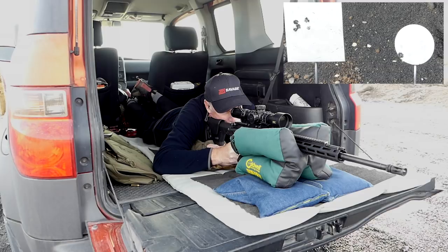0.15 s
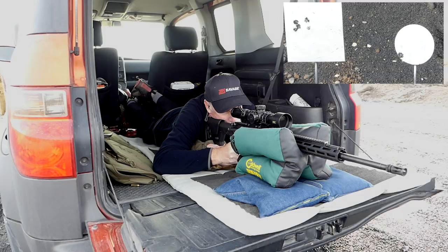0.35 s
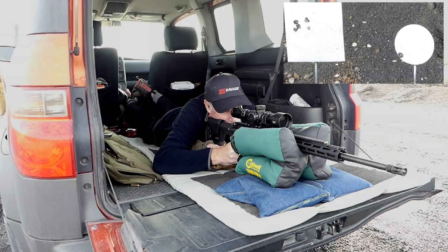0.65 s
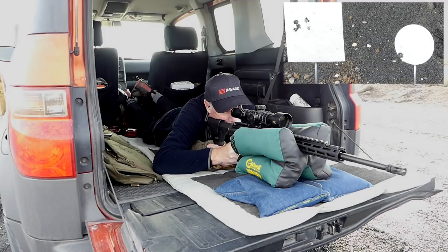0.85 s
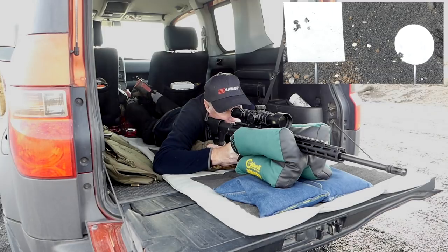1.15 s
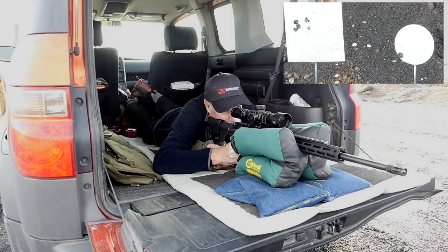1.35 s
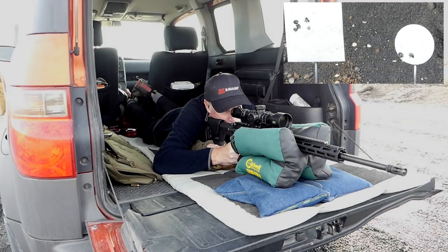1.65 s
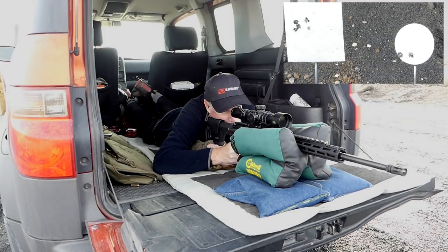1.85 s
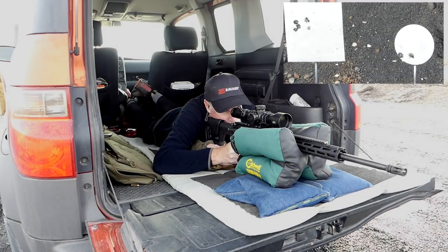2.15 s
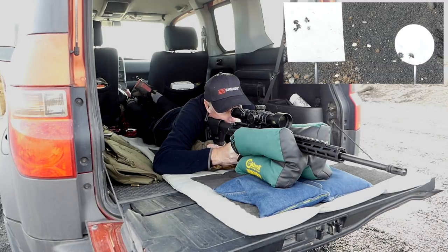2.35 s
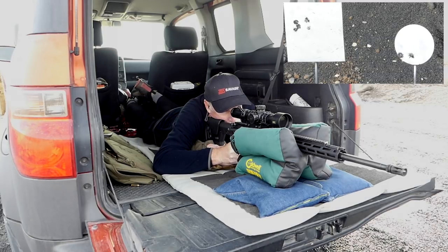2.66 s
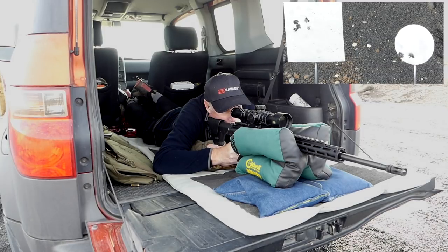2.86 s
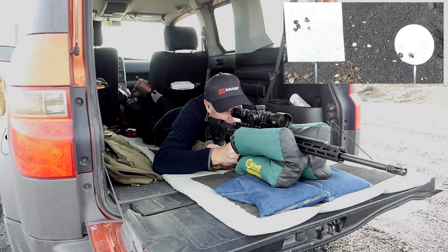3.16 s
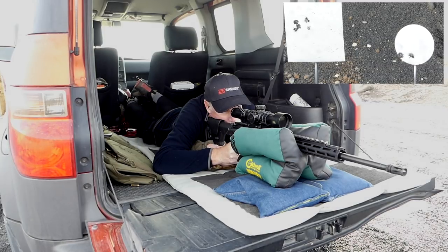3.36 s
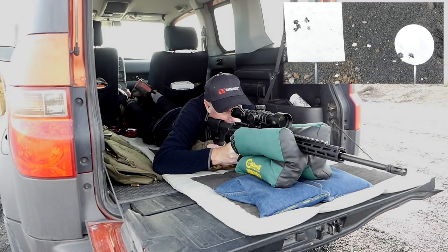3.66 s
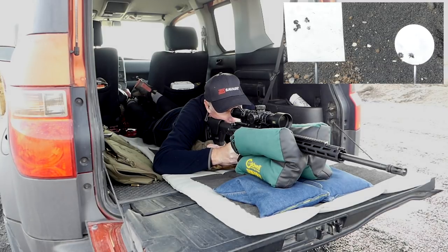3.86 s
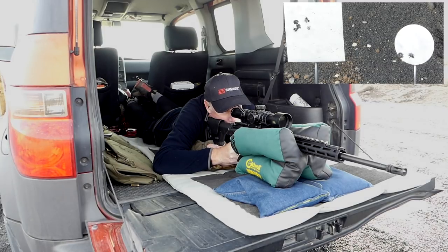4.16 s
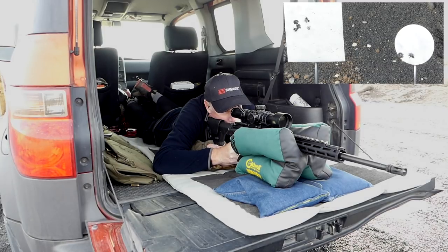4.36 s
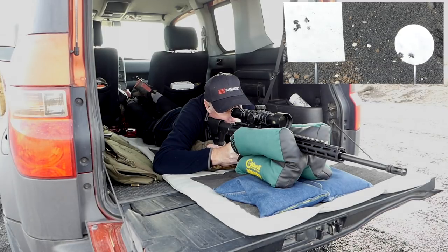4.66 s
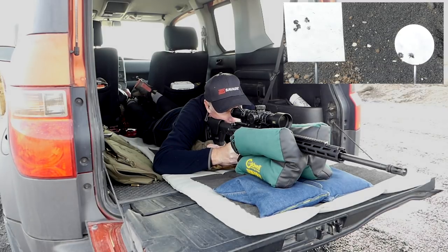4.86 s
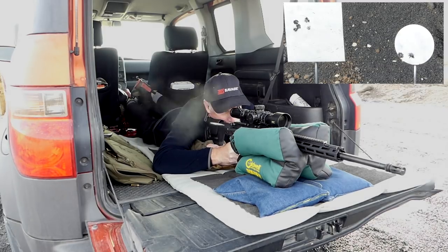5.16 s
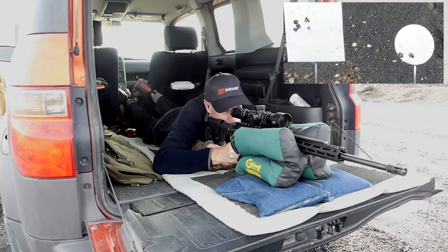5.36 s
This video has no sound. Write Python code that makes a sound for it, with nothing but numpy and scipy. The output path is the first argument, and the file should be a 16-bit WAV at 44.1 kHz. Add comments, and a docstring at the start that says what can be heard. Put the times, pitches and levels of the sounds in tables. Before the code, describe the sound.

Two suppressed rifle shots about four seconds apart, the first followed by a hard metallic plate strike, shimmering ring, pattering grit and rolling echoes.

```python
"""Two suppressed rifle shots and a steel plate

A suppressed rifle fires twice from the back of a car: blast, clattering action, ringing brass, hill echoes.
A far microphone hears the first bullet strike a plate, which rings as grit patters and the blast comes late.
Blows are shaped noise, brass and plate are decaying sines, echoes and air are filtered noise. Each
microphone has its own gain control: the near one turns down bass, the far one everything.
"""
import sys
import numpy as np
from scipy import signal
from scipy.fft import rfft, irfft
from scipy.io import wavfile
from scipy.ndimage import uniform_filter1d

SR = 44100
rng = np.random.default_rng(int(sys.argv[2]) if len(sys.argv) > 2 else 0)


def persist_wave(psi):
    """Save psi, clipped to +-1, as 16-bit WAV."""
    counts = np.round(np.clip(psi, -1, 1) * 32767).astype(np.int16)
    wavfile.write(sys.argv[1], SR, np.atleast_2d(counts).T)


N = 242550  # samples


def amp(db):
    """Turn decibels into a linear gain."""
    return 10 ** (np.asarray(db) / 20)


def evened(x):
    """Scale a sound to an RMS of one."""
    return x / np.sqrt(np.mean(x ** 2) + 1e-20)


def read(points, hz):
    """Read a colour curve at any frequency, along a log-frequency axis."""
    f, value = np.transpose(points)
    return np.interp(np.log(hz + 1), np.log(f + 1), value)


def add(mix, s, sound):
    """Lay a sound into the mix at a time in seconds, cut off at the end."""
    part = mix[:, round(s * SR):][:, :sound.shape[-1]]
    part += sound[..., :part.shape[1]]


def panned(db):
    """Split a left-right level difference into one dB offset for each side."""
    return np.array([[db / 2], [-db / 2]])


def smooth_random(size, width):
    """A slow random curve with an RMS of one."""
    return evened(uniform_filter1d(rng.standard_normal(size), width))


def thinned(x, cut_hz):
    """Take the low end out of a sound."""
    return signal.sosfilt(signal.butter(2, cut_hz, "high", fs=SR, output="sos"), x)


def noise(size, colour, same):
    """Two channels of noise of a given colour (dB as a function of Hz) and left-right likeness."""
    a, b = rng.standard_normal((2, size))
    same = np.clip(same, -1, 1)
    pair = np.array([a, same * a + np.sqrt(1 - same ** 2) * b])
    gain = amp(colour(np.fft.rfftfreq(size, 1 / SR)))
    return evened(irfft(rfft(pair) * gain, size))


def bursts(rows, tail_db, tail_t60, tail_hz):
    """Each blow is a puff of noise with a quick rise and a decay; a weaker, duller tail follows."""
    out, t = np.zeros((2, N)), np.arange(12000) / SR
    for s, db, hz, pan, below, above, rise, t60, same in rows:
        def colour(f):
            low_side = below * np.minimum(np.log2(f / hz + 0.0062), 0)
            high_side = above * np.maximum(np.log2(f / hz + 0.012), 0)
            return low_side - high_side

        puff = noise(len(t), colour, same)
        dull = signal.lfilter(*signal.butter(1, tail_hz, fs=SR), puff)
        sound = amp(-60 * t / t60) * puff + amp(tail_db - 60 * t / tail_t60) * dull
        attack = np.minimum(t / max(rise, 1e-4), 1) ** 2
        # the noise body sits 7 dB under the level in the table, as room for its peaks
        add(out, s, amp(db - 7.0 + panned(pan)) * attack * sound)
    return out


# the two shots: t/s, level/dB
SHOTS = [(0.9449, -1), (5.1809, -0.5)]
# what every shot sets off: hammer, blast, bolt flying back, rattle, thud and clack of the bolt going home
# t/s after the shot, level/dB re the shot, centre f/Hz, left-right/dB, fall below/(dB/octave),
# fall above/(dB/octave), rise/s, t60/s, left-right likeness
RIFLE = [(-.0066, -21.5, 3000, -6, 4.5, 3.5, 0.00031, 0.098, 0.65),
         (0, 5.5, 8000, -1.5, 0.4, -2, 0.00125, 0.025, 0.57),
         (0.0173, 1.5, 1520, 0, 3.5, 4, 0.01, 0.055, 0.79),
         (.03, -12.5, 800, 0.5, -4, -0.5, 0.011, 0.152, 0.55), (.067, -22.5, 478, 3, 12, 25, .005, .09, 1),
         (.077, -18, 4200, -0.5, 11, 5, 0.0022, 0.088, 0.91)]
THUMP_DB, THUMP_AFTER_S, THUMP_S = -9.5, 0.0042, 0.0017  # low push: re the shot, delay, time scale


def rifle():
    """Every shot plays the same chain of blows; the blast's pressure step and undershoot shake the car."""
    rows = [(s + after, db + part_db, *rest) for s, db in SHOTS for after, part_db, *rest in RIFLE]
    out = bursts(rows, tail_db=-13, tail_t60=0.21, tail_hz=2560)
    u = np.arange(4000) / SR / THUMP_S
    push = u * (2 - u) * np.exp(-u)  # swings up, then below zero
    for s, db in SHOTS:
        add(out, s + THUMP_AFTER_S, amp(db + THUMP_DB) * push)
    return out


# at the plate: strike, splinters, plate slamming its hook, rebound, late blast and its echo
# t/s, level/dB, centre f/Hz, left-right/dB, fall below/(dB/octave), fall above/(dB/octave), rise/s, t60/s,
# left-right likeness
STRIKES = [(1.7028, 4, 6640, 6.5, 3.7, 28, 0.00034, 0.027, 0.36),
           (1.708, -14.5, 5200, 3, 17, 8, 0.0027, 0.24, 0.53),
           (1.7155, -10, 2494, 1.5, 2, 4, 0.0024, 0.024, 0.55),
           (1.7275, -5.5, 4860, 3, 8, 15, 0.00085, 0.04, 0.69),
           (1.7497, -2, 6300, 0.5, 3.5, 8, 0.00011, 0.11, 0.68),
           (1.853, -19.5, 3840, -26.5, 2.5, 9.3, 0.0045, 0.057, 0.2),
           (2.01, -33, 8000, -1, 1.5, 15, 0.0065, 0.16, 1),
           (2.5115, -13.5, 1010, 3, 1, 14.5, 0.0011, 0.095, 0.95),
           (2.513, -24, 2600, -2, 1, 20, 0.0017, 0.03, 0.65),
           (2.654, -35, 690, -16, 7, 12, 0.0013, 0.053, 0.53)]


def strikes():
    """The bullet's strike, the plate's blows and the late blast are bursts of noise."""
    return bursts(STRIKES, tail_db=-17, tail_t60=0.49, tail_hz=6030)


# pressure swings at the far microphone; opposite shares = the capsule pair rocks
# t/s, level/dB, starting f/Hz, t60/s, slowing/s, left share, right share
JOLTS = [(1.7038, 4, 540, .03, .005, -1., 1.), (1.7503, -6, 400, .025, .008, 1., -1.),
         (1.704, -10, 260, .022, .1, 1., 1.), (1.75, 5, 1250, .007, .01, .9, 1.),
         (2.5134, -13, 440, .025, .1, 1.3, 1.), (2.5125, -27, 190, .045, .1, 1.2, 1.)]


def jolts():
    """Each pressure wave gives a damped swing of a few cycles, each slower than the last."""
    out, t = np.zeros((2, N)), np.arange(4000) / SR
    for s, db, hz, t60, slowing, left, right in JOLTS:
        turns = hz * slowing * (1 - np.exp(-t / slowing))
        swing = amp(db - 60 * t / t60) * np.sin(2 * np.pi * turns)
        add(out, s, np.array([[left], [right]]) * swing)
    return out


# plate modes, each with a close partner; the swell is the swinging face turning to the microphone
# f/Hz, level/dB, t60/s, beat f/Hz, partner's share, swell/s
PLATE = [(775, -37.5, 3.94, 0.22, 0.8, 0.23), (865, -51, 3.7, 0.42, .4, 0.4),
         (1530, -47, 1.3, 1.3, .4, 0.069), (3640, -25.5, 1.38, 0.83, 0.14, 0.29),
         (4102, -22, .23, 30., .3, .003), (5050, -31, 1.58, 2.8, 0.11, 0.23),
         (5000, -25, 0.8, 7.4, .3, 0.1), (5130, -25, 0.14, 11, .5, .003),
         (6050, -31.5, 0.23, 7, 0.36, .003), (6600, -44.5, 1.24, 6.6, 0.93, .15),
         (8060, -23, 0.55, 2.9, 0.42, 0.059), (8414, -51, 0.8, 3., 0.47, .1),
         (10340, -38, 1.16, 5.65, 0.76, 0.082), (10800, -41.5, .25, 3., .4, .01),
         (12160, -32, .1, 3., .4, 0.0086), (12457, -43.5, .9, 5.5, 0.46, 0.11),
         (12740, -56.5, .4, 3., .4, .01), (14675, -61, .6, 2.5, .4, .05)]
PLATE_S, TURNS_AWAY_S = 1.75, 1.0  # start of the ring; time from there to turn away


def plate():
    """Every mode is a close pair that beats; the swinging face turns to the microphone and away again."""
    out, t = np.zeros((2, N)), np.arange(2 * SR) / SR
    for hz, db, t60, beat, share, swell in PLATE:
        pair = np.sin(2 * np.pi * hz * t) - share * np.sin(2 * np.pi * (hz - beat) * t)
        facing = 1 - np.exp(-(t / max(swell, 1e-3)) ** 3)
        facing *= np.exp(-(t / TURNS_AWAY_S) ** 4)
        add(out, PLATE_S, amp(db - 60 * t / t60 + panned(3)) * facing * pair)
    return out


# brass cases landing and other knocks round the car
# t/s, level/dB, centre f/Hz, left-right/dB, fall below/(dB/octave), fall above/(dB/octave), t60/s
KNOCKS = [(1.187, -21.5, 2190, 0.5, 0.7, 5.5, 0.084), (1.522, -27.5, 1510, 1, 1, 8, 0.25),
          (2.935, -8.5, 3870, 0.5, 1, 7, 0.075), (3.5113, -26, 1510, -3, 1.5, 14, 0.14),
          (3.603, -33, 830, -4, 14, 15, 0.05), (5.028, -38, 5980, -5, 10.5, 8, 0.019),
          (5.107, -34, 1990, 4.5, -3.7, 7, 0.034), (5.414, -25.5, 456, 2, 5.5, 6, 0.09),
          (5.442, -41, 2520, 0, 6, 10, 0.021), (5.492, -39, 3000, -5, 3, 10, .05)]
KNOCK_RISE_S, KNOCK_SAME = 0.0017, .9  # rise; left-right likeness


def knocks():
    """Knocks are thin noise bursts that share one rise and one stereo width."""
    rows = [(*row, KNOCK_RISE_S, t60, KNOCK_SAME) for *row, t60 in KNOCKS]
    return thinned(bursts(rows, tail_db=-23.5, tail_t60=0.18, tail_hz=2490), cut_hz=340)


# modes of a brass case: f/Hz before the pitch factor, level/dB re the ring, t60/s
BRASS = [(8064, -19, 0.034), (11700, -15, 0.085), (12630, -30, 0.15), (13330, 2, 0.15), (13640, -4, .05)]
# its rings: t/s, level/dB, pitch factor of that case
BRASS_RINGS = [(1.189, -46, 0.93), (1.203, -47.5, 1.03), (1.527, -51, 1.01), (5.492, -45, 1.02)]


def brass():
    """The thin case rings high after it bounces, as a sum of decaying sines."""
    out, t = np.zeros((2, N)), np.arange(8000) / SR
    for s, db, pitch in BRASS_RINGS:
        ring = 0
        for hz, mode_db, t60 in BRASS:
            ring = ring + amp(mode_db - 60 * t / t60) * np.sin(2 * np.pi * hz * pitch * t)
        add(out, s, amp(db) * ring * np.minimum(t / .003, 1))
    return out


# small dry ticks, like pebbles landing: t/s, peak level/dB, f/Hz, left-right/dB
TICKS = [(1.4586, -24, 4000, -6), (1.523, -25, 2640, -2), (1.55, -24, 3850, -3), (1.6085, -30.5, 3200, -8),
         (1.634, -30, 3660, -4), (1.694, -31, 2993, -6), (1.9023, -34, 2960, -1), (2.0825, -38, 2800, -3),
         (2.1385, -37, 2680, -8), (2.1934, -38, 3340, -8), (2.3023, -34.5, 2770, -6),
         (2.335, -42, 2860, -7), (2.3607, -46, 2770, -6), (2.3973, -40, 2970, -5), (2.47, -38, 3220, -8),
         (3.317, -34.5, 3040, -10), (3.5108, -22.5, 2940, -7), (3.5102, -20.5, 1046, -3.5)]
TICK_CYCLES, TICK_RISE_S = 12, .0005  # cycles to fall 60 dB; rise


def ticks():
    """Each tick is a few cycles of a sine that die at once."""
    out, t = np.zeros((2, N)), np.arange(1500) / SR
    for s, db, hz, pan in TICKS:
        decay = amp(-60 * t * hz / TICK_CYCLES)
        ring = decay * np.minimum(t / TICK_RISE_S, 1) ** 2 * np.sin(2 * np.pi * hz * t)
        add(out, s, amp(db + panned(pan)) * ring / abs(ring).max())
    return out


# course of the grit: t/s, level/dB
GRIT = [(1.76, -31), (2.186, -54), (2.49, -60.5)]
# colour of its wash: f/Hz, level/dB
GRIT_COLOUR = [(180, -31.5), (300, -8), (1620, -8), (3730, -4.5), (4690, -13), (5090, -4.5), (7540, -49),
               (8320, -16), (15000, -35)]


def grit():
    """Lead dust and gravel rain down round the plate: a wash of noise with dense small ticks."""
    s, db = np.transpose(GRIT)
    t = np.arange(N) / SR
    landings = rng.random(N) < 120 / SR  # about 120 a second
    hits = amp(2.6 * np.minimum(rng.exponential(1, N), 4)) * landings
    patter = evened(signal.lfilter([1], [1, -np.exp(-1 / (0.0011 * SR))], hits))  # each dies in milliseconds
    tick_colour = lambda f: -14 * np.log2(f / 2900 + .01) ** 2
    wash = noise(N, lambda f: read(GRIT_COLOUR, f), 0.5)
    grains = evened(patter * noise(N, tick_colour, 1.0))
    fade = np.clip(np.minimum(t - s[0], s[-1] + 0.2 - t) / 0.09, 0, 1)
    return amp(np.interp(t, s, db)) * fade * (wash + 0.41 * grains)


# orders of the squeak: multiple of the base pitch, level/dB
SQUEAK_ORDERS = [(1, -11), (2, -2), (3, -3.5), (4, -1.5), (5, -5), (6, -16)]
SQUEAK_S, SQUEAK_LENGTH_S, SQUEAK_HZ = 3.287, 0.0363, 680  # start, length, mean pitch
SQUEAK_DB, SQUEAK_SWELL_DB = -45.5, 2  # starting level; rise to the end


def squeak():
    """A hinge gives a short stick-slip chirp of unsteady pitch that swells, then stops."""
    out, t = np.zeros((2, N)), np.arange(0, SQUEAK_LENGTH_S, 1 / SR)
    wander = uniform_filter1d(rng.standard_normal(len(t)), 60)
    turns = np.cumsum(SQUEAK_HZ * (1 + .45 * wander)) / SR
    tone = evened(sum(amp(g) * np.cos(2 * np.pi * k * turns + k ** 2) for k, g in SQUEAK_ORDERS))
    tone = tone * amp(2.5 * smooth_random(len(t), 70))
    ends = np.minimum(np.minimum(t, SQUEAK_LENGTH_S - t) / 0.0036, 1)
    level_db = SQUEAK_DB + SQUEAK_SWELL_DB * t / SQUEAK_LENGTH_S
    add(out, SQUEAK_S, amp(level_db + panned(-4)) * ends * tone)
    return out


# echoes rolling back from the hills: t/s after the shot, boom of the blast level/dB,
# sizzle of the bullet's crack level/dB, centre of the sizzle f/Hz
ECHOES = [(.085, -51.5, -49, 3900), (.2, -49.5, -53, 2800), (.32, -48.5, -52.5, 2680),
          (.45, -44.5, -45, 3060), (.6, -41, -42, 2460), (.72, -45.5, -51.5, 3700), (.82, -54, -56, 2500),
          (.9, -50.5, -44, 3500), (1.0, -52.5, -53, 3870), (1.3, -63, -57.5, 3320),
          (1.62, -54, -60.5, 1510), (1.85, -60, -60, 2220), (2.07, -62, -60, 2600), (2.2, -73, -49.5, 1450),
          (2.45, -59, -57.5, 2140), (2.53, -60, -60.5, 2210), (2.66, -69, -52.5, 1600),
          (2.8, -58, -67, 1450)]
# colour of the boom: f/Hz, level/dB
ECHO_COLOUR = [(59, -44.5), (100, -5.5), (200, 5), (541, 4.5), (634, -4), (694, -2), (1500, -10),
               (1950, -50.5), (3300, -120)]
SIZZLE_TOP_DB, TOP_FADE_DB = -16, 35.5  # flat floor that holds up the treble; its loss each second


def since_shot(t):
    """Seconds since the latest shot, endless before the first."""
    times = [s for s, db in SHOTS]
    return t - np.array([-np.inf] + times)[np.searchsorted(times, t)]


def echoes():
    """After each shot a dull boom and a grainy sizzle, its centre wandering as near and far slopes answer."""
    after, boom_db, sizzle_db, centre_hz = np.transpose(ECHOES)
    t = np.minimum(since_shot(np.arange(N) / SR), 10)
    fade = np.clip(np.minimum(t - after[0], after[-1] + 0.024 - t) / 0.043, 0, 1)
    lumps = amp(1.5 * smooth_random(N, 120))
    grainy = evened(lumps * noise(N, lambda f: 0 * f, 0.88))
    hz, frames, z = signal.stft(grainy, SR, nperseg=512)
    late = np.minimum(since_shot(frames), after[-1])
    octaves = np.log2((hz[:, None] + 20) / np.interp(late, after, centre_hz))
    shape = amp(3.5 * np.minimum(octaves, 0) - 8.6 * np.maximum(octaves, 0) ** 2)
    shape = shape + amp(SIZZLE_TOP_DB - TOP_FADE_DB * late)
    shape = shape / np.sqrt(np.mean(shape ** 2, 0))  # moving the colour leaves the level alone
    sizzle = signal.istft(z * shape, SR, nperseg=512)[1][:, :N]
    boom = noise(N, lambda f: read(ECHO_COLOUR, f), 0.94)
    boom = amp(np.interp(t, after, boom_db)) * boom
    sizzle = amp(np.interp(t, after, sizzle_db)) * sizzle
    return fade * (boom + sizzle)


# pips in the far air: t/s, level/dB
BLIPS = [(2.339, -48), (2.62, -39), (2.841, -40), (3.928, -40.5), (4.226, -40.5), (4.624, -42),
         (4.729, -42), (5.029, -41.5), (5.116, -38.5)]
BLIP_HZ, BLIP_S, BLIP_RIGHT = 879, 0.034, -0.5  # pitch, length, right share


def blips():
    """A faint short sine pips now and then in the far air, opposite in the two sides."""
    out, t = np.zeros((2, N)), np.arange(0, BLIP_S, 1 / SR)
    pip = np.sin(np.pi * t / BLIP_S) ** 2 * np.sin(2 * np.pi * BLIP_HZ * t)
    for s, db in BLIPS:
        add(out, s, amp(db) * np.array([[1], [BLIP_RIGHT]]) * pip)
    return out


# colour of the air at the near microphone: f/Hz, level/dB
NEAR_AIR = [(18, -47.5), (30, -10.5), (81, 0.5), (157, 1), (252, -9.5), (280, -7.5), (311, -13), (437, -12),
            (801, -17), (889, -11), (1590, -21.5), (14400, -40.5), (16000, -82.5)]
# colour of the air at the far microphone: f/Hz, level/dB
FAR_AIR = [(18, -34.5), (30, -31.5), (75, -9.5), (199, -7), (336, -11), (437, 1.5), (632, -5), (684, -17.5),
           (740, -1.5), (889, -4), (1130, -16), (3310, -29), (12600, -46), (14800, -64), (16000, -40)]
NEAR_DB, FAR_DB = -55.5, -49.5  # RMS of each air before gain control


def air(colour, db, same, swell_db, patchy_db):
    """Breeze and distant rumble: coloured noise with a slow swell, broken into drifting patches."""
    steady = noise(N, lambda f: read(colour, f), same)
    hz, frames, z = signal.stft(steady, SR, nperseg=1024, noverlap=768)
    patches = uniform_filter1d(rng.standard_normal(z.shape[1:]), size=4, axis=0)
    patches = evened(uniform_filter1d(patches, size=7, axis=1))
    swell = evened(uniform_filter1d(smooth_random(len(frames), 12), size=12))
    z = z * amp(swell_db * swell + patchy_db * patches * (hz[:, None] < 1500))
    return amp(db) * evened(signal.istft(z, SR, nperseg=1024, noverlap=768)[1][:, :N])


def hiss():
    """A bright steady noise floor that climbs 6 dB an octave from 600 to 6000 Hz."""
    return amp(-61.5) * noise(N, lambda f: 6 * np.log2(np.clip(f / 6000, .1, 1)), 0.54)


def turned_down(x, knee_db, depth_db, recover_db, attack):
    """Gain that drops after a loud sound, stays at its limit a while, then recovers at so many dB a second."""
    power = uniform_filter1d((x ** 2).mean(0), 200, origin=99)  # over the last few milliseconds
    power_db = 10 * np.log10(abs(power) + 1e-12)
    fall = np.arange(N) * recover_db / SR
    held_db = np.maximum.accumulate(power_db + fall) - fall
    over_db = np.clip(held_db - knee_db, 0, depth_db)
    r = np.exp(-1 / (attack * SR))
    return 1 / amp(signal.lfilter([1 - r], [1, -r], over_db))


def scene():
    """The near microphone cuts its bass after a blast, the far one all its gain; both are mixed."""
    near = rifle() + knocks() + brass() + ticks() + squeak() + echoes()
    near += air(NEAR_AIR, NEAR_DB, 0.86, swell_db=1.5, patchy_db=1.5)
    bass = signal.sosfiltfilt(signal.butter(4, 140, fs=SR, output="sos"), near)
    near += bass * (turned_down(near, knee_db=-31, depth_db=16, recover_db=39, attack=0.036) - 1)
    far = thinned(strikes() + jolts(), cut_hz=130) + plate() + grit() + blips()
    far += air(FAR_AIR, FAR_DB, -0.86, swell_db=3.0, patchy_db=2.0)
    far *= turned_down(far, knee_db=-21.5, depth_db=8.5, recover_db=52.5, attack=0.041)
    return near + np.clip(far, -1, 1) + hiss()


EDGE_HZ, OFFSET = 15800, -.0029  # band limit; converter offset, re full scale


def record(dry):
    """A low cut and a small converter offset; peaks clip at full scale; then the band limit."""
    cut = signal.sosfilt(signal.butter(3, 58, "high", fs=SR, output="sos"), dry) + OFFSET
    edge = signal.firwin(511, EDGE_HZ, window=("kaiser", 9), fs=SR)[None]
    return np.clip(signal.oaconvolve(np.clip(cut, -1, 1), edge, "same"), -1, 1)


dry = scene()
out = record(dry)
persist_wave(out)
```